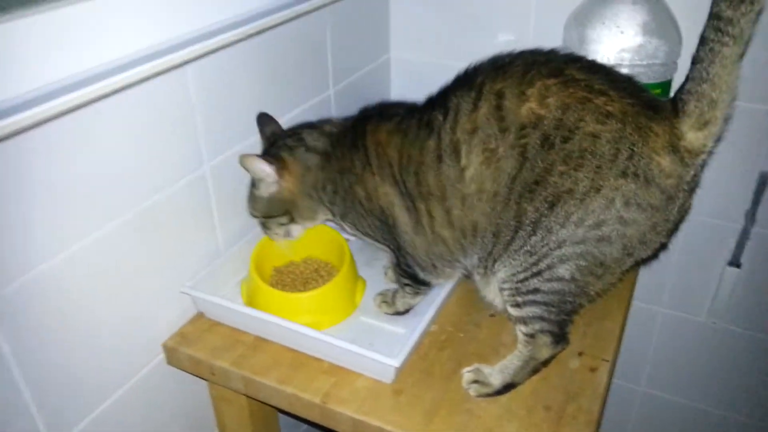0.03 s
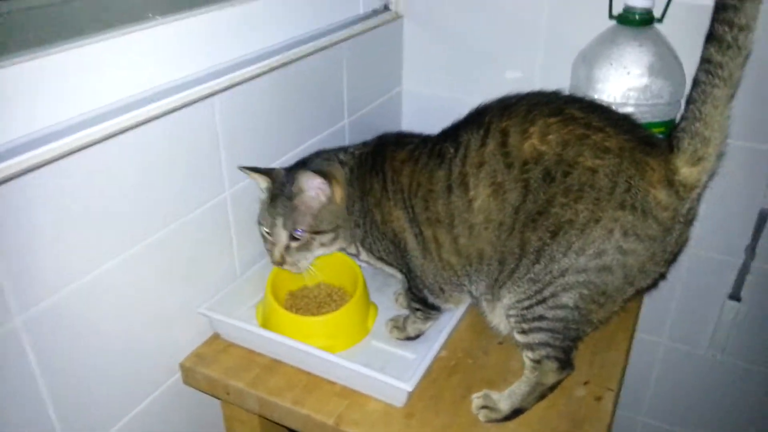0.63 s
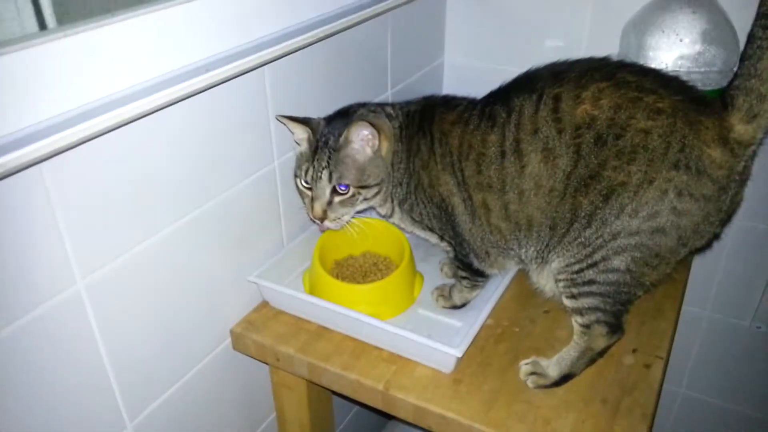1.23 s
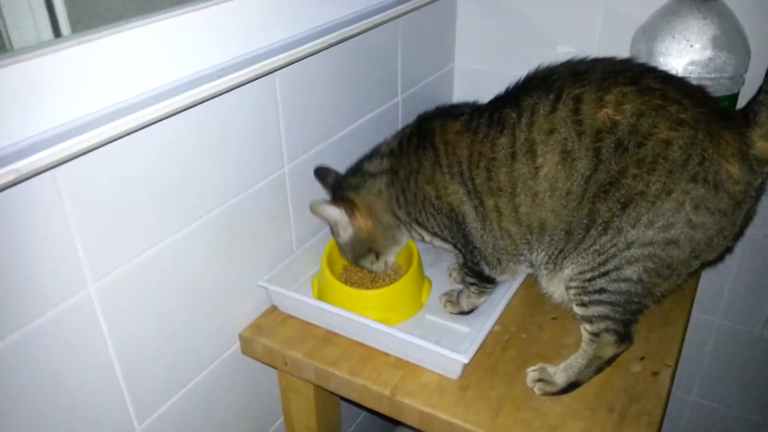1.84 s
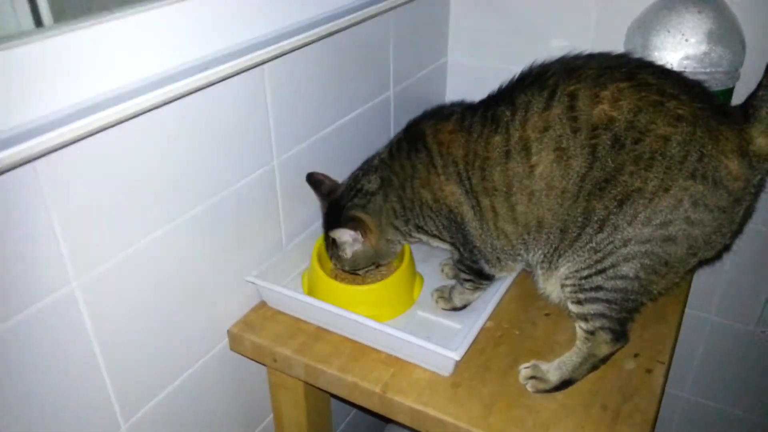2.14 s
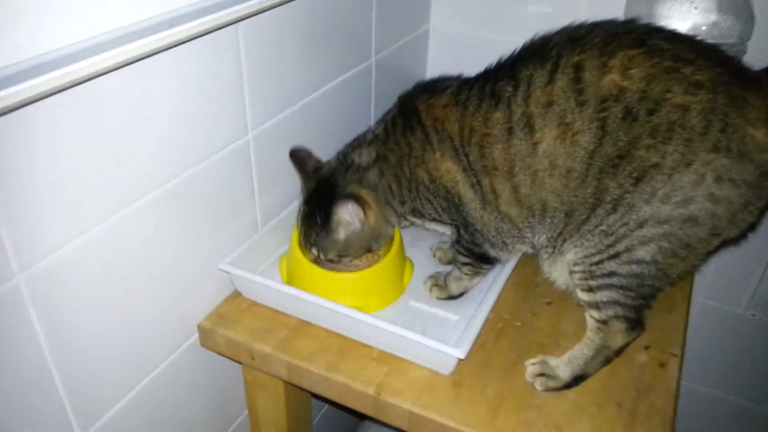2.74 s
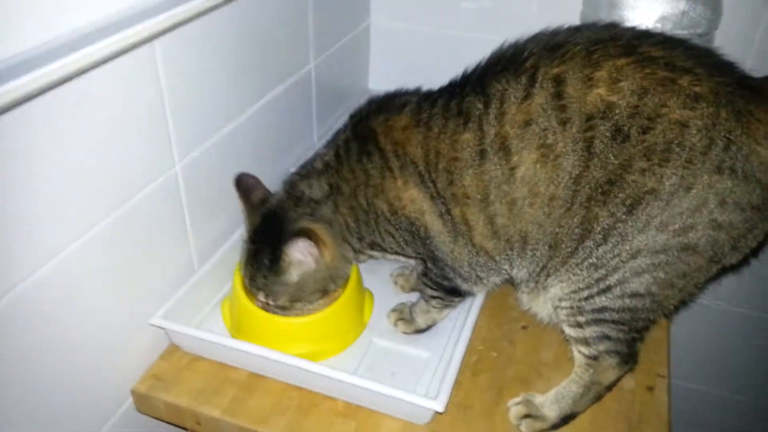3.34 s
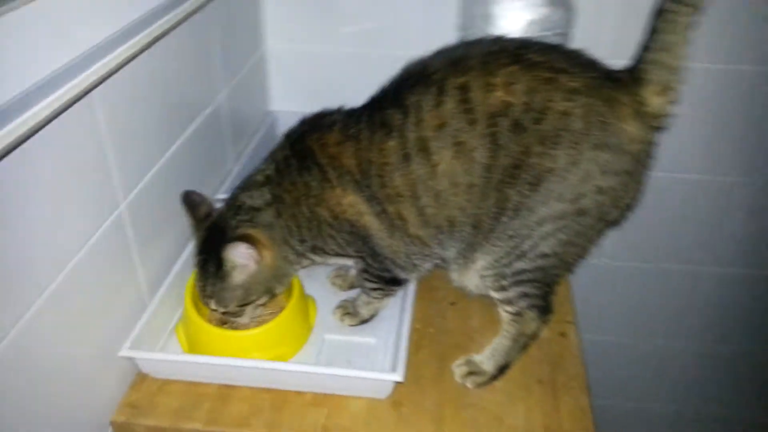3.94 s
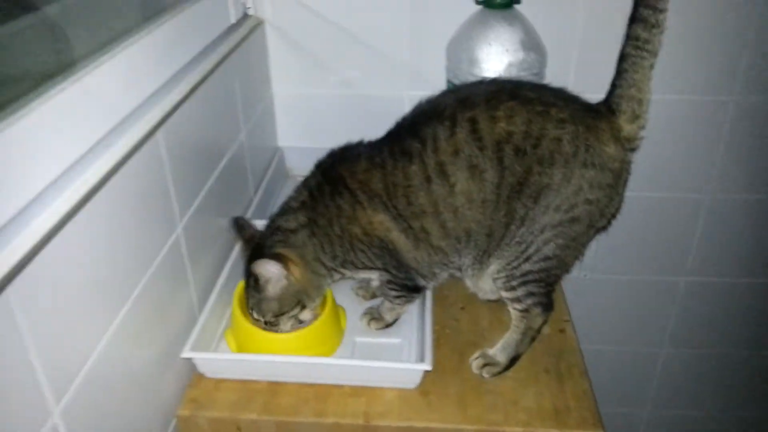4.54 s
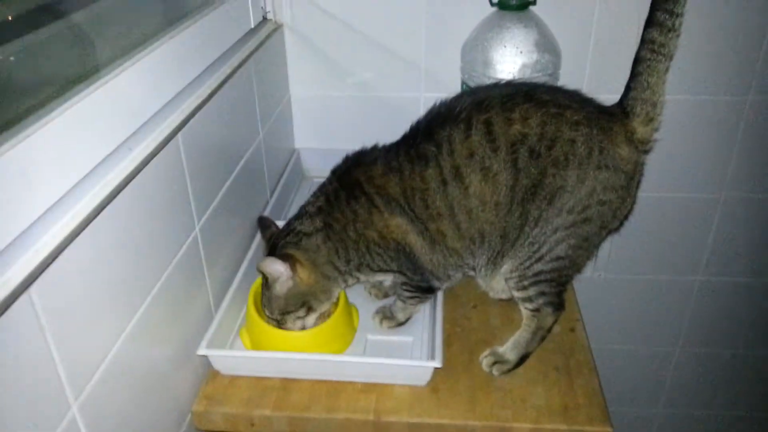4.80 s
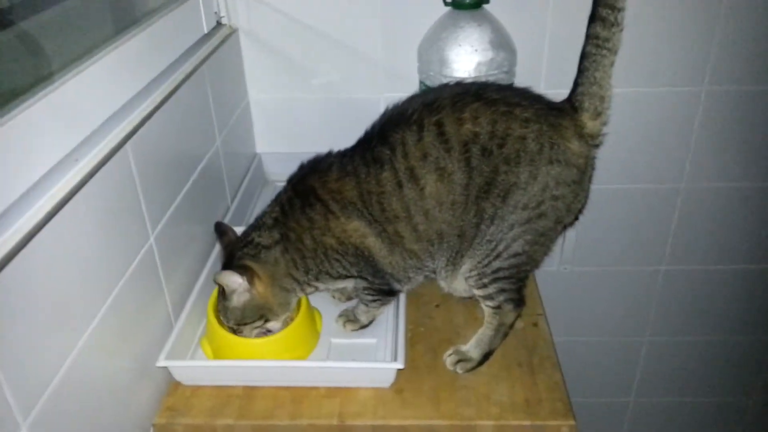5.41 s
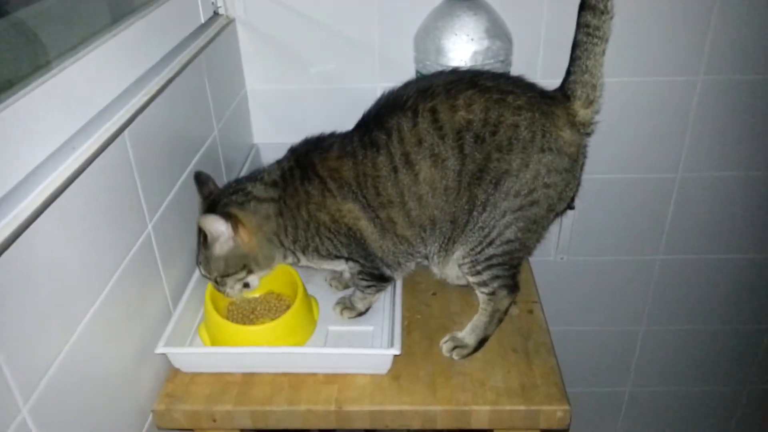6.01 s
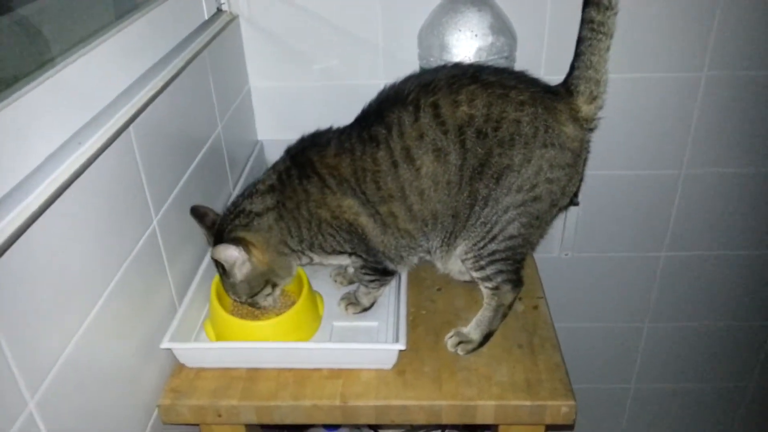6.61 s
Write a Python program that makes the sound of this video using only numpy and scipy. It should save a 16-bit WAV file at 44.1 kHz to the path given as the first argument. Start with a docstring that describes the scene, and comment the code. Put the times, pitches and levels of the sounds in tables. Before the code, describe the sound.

Close, crackling squeezes of a plastic bag give way to a cat quietly crunching dry food from a plastic bowl.

```python
"""Food bag and cat in a tiled room

Close by, a stiff food bag is squeezed: its film crackles, creases snap through and panels buckle.
Then a cat noses through kibble in a resonant plastic bowl and crunches it by brittle fracture,
in two spells, brushing the rim as it lifts its head between them.
Hard walls reflect every snap; a faint hiss of air lies underneath."""
import sys
import numpy as np
from scipy import signal
from scipy.fft import rfft, irfft, next_fast_len
from scipy.io import wavfile
from scipy.ndimage import uniform_filter1d

SR = 44100
rng = np.random.default_rng(int(sys.argv[2]) if len(sys.argv) > 2 else 0)


def master_out(mix):
    """Clip the mix to full scale and print it as 16-bit PCM to the path in sys.argv[1]."""
    frames = np.transpose(np.atleast_2d(mix))
    ceiling = np.clip(frames, -1, 1)
    pcm = np.round(ceiling * 32767).astype(np.int16)
    wavfile.write(sys.argv[1], SR, pcm)


N = 293701

# squeezes of the bag: (start [s], length [s], level [dB], body [dB], crispness [dB])
SQUEEZES = [(0.075, .04, -43, 6, -4), (0.115, 0.059, -22.5, 0, 4), (0.165, 0.035, -29, 12, -1),
            (0.27, 0.09, -36.5, 7.5, 0), (0.37, .035, -35, 6.5, 10), (0.41, 0.086, -29, 1.5, 1),
            (0.738, 0.033, -45, 13.5, 1), (0.822, 0.036, -18.5, 3.5, 2), (0.93, 0.093, -41, 8.5, 8.5),
            (1.03, 0.069, -41, 11, 2), (1.43, 0.055, -41.5, -11, 5), (1.485, 0.13, -38.5, 6, 5.5),
            (1.583, 0.045, -24.5, -1, 6), (1.76, 0.065, -30.5, 0.5, -1.5), (1.822, 0.016, -29.5, 8.5, 3),
            (1.87, 0.13, -38, 6.5, 0.5), (1.964, 0.037, -28, 7.5, 4), (2.035, 0.019, -33, 4, 0),
            (2.128, .03, -33, 10, 3), (2.18, 0.044, -27, 2, 1.5), (2.235, 0.066, -32.5, 4, 1),
            (2.335, .025, -40.5, 12.5, -1)]
# rustle while the bag is held: (start [s], length [s], level [dB], body [dB], crispness [dB])
HOLDING = [(0.0, 2.47, -47.5, 1.5, 4)]
# spectrum of the film: (frequency [Hz], level [dB])
FILM_SPECTRUM = [(30, -33), (100, -61), (175, -20), (351, -10), (450, -6), (600, -5), (931, 0), (1200, -1),
                 (1790, 3), (4000, 1.5), (4900, -3.5), (5900, -8.5), (13800, -17), (15500, -47)]
def crumpling():
    """Stiff film releases strain in many tiny jumps, a crackle without bass."""
    squeezing = effort(SQUEEZES, attack_s=0.0067, release_s=0.025)
    holding = effort(HOLDING, attack_s=0.025, release_s=0.16)
    hand = np.hypot(squeezing, holding)
    film = crackle(hand, FILM_SPECTRUM, per_s=2000, spread_db=5, clump_db=3, friction=0.36)
    return butter(from_db(1.5) * film, 247, "high")


# single creases: (time [s], level [dB], ring [Hz], body [dB], crispness [dB])
CREASES = [(0.0584, -41, 4200.0, 5, -9), (0.1182, -9, 4380, -27, -5), (0.1766, -12.5, 3400, 3.5, 2),
           (0.3707, -14.5, 3970, 3.5, 4), (0.4081, -10.5, 4620, 2.5, 5), (0.446, -11, 4200.0, -29, 5.5),
           (0.7378, -22.5, 3280, 4.5, -23), (0.7772, -28, 3800, 11, 4), (0.8141, -16, 3300.0, -7, -28),
           (0.8556, -22, 4330, 8, -6), (0.876, -11.5, 3260, 3, 1), (0.9478, -17.5, 4150, -10, -11),
           (0.9818, -26, 3700.0, -10, 0), (1.4866, -18.5, 3600, -1.5, -5), (1.5166, -20, 3200.0, -1, -9),
           (1.5799, -14, 3700.0, -5, -6), (1.595, -15, 3500.0, 8.5, -8), (1.6223, -11.5, 3530, -9, -14),
           (1.6365, -16.5, 4100, 2, 5.5), (1.8278, -9.5, 3600, -3.5, -6), (1.9411, -15.5, 3680, -27, -11),
           (1.967, -7, 4900, -33, -5.5), (1.994, -20.5, 3300.0, 12, -11), (2.006, -23.5, 4100.0, 14, 11),
           (2.0748, -11, 4340, -15, -3.5), (2.1322, -20, 4300.0, 1, 2), (2.1465, -26, 3600.0, 12, -16),
           (2.1656, -11, 2970, -5, 1.5), (2.1985, -20.5, 3500, 9, 6), (2.2793, -15, 4440, 1, -9),
           (2.3342, -19.5, 4100, -0.5, -10)]
# spectrum of a snapping crease: (frequency [Hz], level [dB])
CREASE_SPECTRUM = [(30, -34.5), (100, -35), (175, -36.5), (400, -8), (600, -4), (1100, -3), (2000, 4.5),
                   (3000, 1.5), (4200, 1), (5000, -0.5), (6000, -8), (13800, -16.5), (15500, -32.5)]
def creases():
    """Snap-through: a loaded crease jumps to a new shape with a sharp click."""
    clicks = snaps(CREASES, CREASE_SPECTRUM, tear_s=0.001, tear=0.61, width_hz=980, ringing=0.59)
    return from_db(-0.07) * clicks


# dull knocks of whole panels: (time [s], level [dB], pitch [Hz])
BUCKLES = [(0.203, -27.5, 523), (0.411, -25, 460), (2.009, -26.5, 423), (2.282, -25.5, 430)]
def buckles(width_hz=180, soft_hz=700):
    """Damped oscillation: a soft push sets a buckling panel swinging for a few cycles."""
    out = np.zeros(N)
    for s, db, hz in BUCKLES:
        push = butter(signal.unit_impulse(N, int(s * SR)), soft_hz, "low")
        swing = resonate(resonate(push, hz, width_hz), hz, width_hz)
        out += from_db(db) * unit(swing)
    return out * np.sqrt(IMPULSE_S * SR)


# stereo balance of the bag: (frequency [Hz], left minus right [dB])
BAG_BALANCE = [(200, -1), (700, -1.5), (1290, 1), (2380, 4), (4400, 2.5), (8120, -2.5), (15000, 0.5)]
def bag(tails):
    """Superposition: film, creases and panels radiate together into the room."""
    source = crumpling() + creases() + buckles()
    heard = in_room(source, tails, left_lag_s=.00023, direct_db=-4, scatter_db=-4.5, wet_db=-3, sway_db=3)
    return shaded(heard, BAG_BALANCE)


# strokes of the jaw: (start [s], length [s], level [dB], body [dB], crispness [dB])
CHEWS = [(2.645, 0.046, -32, 3.5, 1), (2.803, 0.039, -38.5, 5, 3), (2.878, .045, -42.5, -1, 5.5),
         (2.995, 0.087, -42, 9, 7), (3.242, 0.071, -44.5, 8, 3), (3.318, 0.048, -41, -3, -4),
         (3.466, .035, -43, -2.5, -8), (3.572, 0.03, -45.5, 1, -3), (3.778, 0.062, -46.5, 10, -18),
         (4.545, 0.064, -47.5, -10, 0), (4.685, 0.043, -40.5, 1.5, -11), (4.758, 0.064, -39.5, 3, -11),
         (4.97, .028, -38.5, -13, -2), (5.125, 0.021, -37, -17, -8), (5.243, 0.021, -40, 4.5, -7),
         (5.416, 0.032, -36, -2, -16), (5.568, 0.071, -40.5, -4, -19), (5.672, 0.047, -35, 0.5, -9),
         (5.946, 0.02, -46, 3, -10), (6.268, 0.025, -52.5, 9.5, 7.5), (6.422, 0.023, -53.5, 5.5, 8.5)]
# the muzzle stirs the pellets: (start [s], length [s], level [dB], body [dB], crispness [dB])
NOSING = [(2.42, 1.473, -49, -0.5, 4.5), (4.49, 1.26, -50.5, 3, 1.5)]
# spectrum of grinding kibble: (frequency [Hz], level [dB])
KIBBLE_SPECTRUM = [(100, -58), (225, -33.5), (450, -6.5), (600, -7.5), (760, -1.5), (1150, -5.5),
                   (1500, -2), (1950, 0), (3400, 1), (4700, -1), (5500, -11.5), (7000, -14), (14000, -25),
                   (15500, -55)]
def grinding():
    """Dry friction and tiny fractures: pellets shift in the bowl and grind between the teeth."""
    chewing = effort(CHEWS, attack_s=0.016, release_s=0.016)
    nosing = effort(NOSING, attack_s=0.039, release_s=0.12)
    mouth = np.hypot(chewing, nosing)
    grit = crackle(mouth, KIBBLE_SPECTRUM, per_s=3200, spread_db=4, clump_db=1.5, friction=0.67)
    return from_db(1.37) * grit


# pellets that crack or click: (time [s], level [dB], ring [Hz], body [dB], crispness [dB])
BITES = [(2.5088, -40, 3200, 1, -1), (2.6009, -24, 2860, -2.5, -2), (2.8254, -34, 2740, 6, -5),
         (3.012, -27.5, 2400, -2.5, -14), (3.1147, -27, 3500, -7, -15), (3.4815, -43, 2800, -2, -8),
         (3.8346, -36, 2500, 4.5, -16), (4.111, -39, 2430, -7, -22), (4.6926, -29.5, 1700, -1.5, -22.5),
         (4.991, -36.5, 3100, 7, 10), (5.1386, -29.5, 2200, 0.5, 8), (5.152, -27, 3630, -20, 2),
         (5.2568, -26.5, 3500, -3, 7), (5.429, -36.5, 2000, 7, -12), (5.4468, -27.5, 3400, -7, 4),
         (5.5811, -30.5, 2380, 2, 3), (5.6405, -27, 2690, 1, 6), (5.8809, -35, 2000, 1.5, -20),
         (5.9553, -29.5, 2200, -2.5, -13.5), (6.2705, -27.5, 4940, -18, 7.5), (6.277, -37, 4700, -4, 6),
         (6.453, -48, 2900, -1, 6)]
# spectrum of a breaking pellet: (frequency [Hz], level [dB])
PELLET_SPECTRUM = [(100, -53), (450, -18.5), (760, -2), (1400, 0), (2400, -3), (3200, -1), (4600, -2.5),
                   (5600, -10.5), (7000, -16.5), (14000, -48), (15500, -47)]
def bites():
    """Brittle fracture: a pellet cracks with a heavily damped ring, too small to radiate bass."""
    cracks = snaps(BITES, PELLET_SPECTRUM, tear_s=0.0018, tear=1.38, width_hz=1800, ringing=0.6)
    return butter(from_db(1.1) * cracks, 636, "high", order=3)


# modes of the plastic bowl: (frequency [Hz], bandwidth [Hz], gain [dB])
BOWL_MODES = [(932, 230, -2.5), (1345, 510, -3.5), (2420, 350, -18), (3500, 240, -22)]
def bowl(x):
    """Cavity resonance: the bowl adds its hollow ring to the sound made in it."""
    return x + sum(from_db(db) * np.pi * width / SR * resonate(x, hz, width)
                   for hz, width, db in BOWL_MODES)


# spectrum of fur on the rim: (frequency [Hz], level [dB])
FUR_SPECTRUM = [(530, -47), (900, -16), (943, -11), (1410, -9.5), (2180, -2), (4060, -7), (13800, -27),
                (15000, -32)]
def brush(start_s=4.135, length_s=0.21, level_db=-44.5):
    """Sliding friction: hairs on plastic hiss in proportion to the speed of the lifting head."""
    speed = np.sin(np.pi * np.clip((np.arange(N) / SR - start_s) / length_s, 0, 1))
    hiss = signal.fftconvolve(rng.standard_normal(N), click_of(FUR_SPECTRUM))[:N]
    return from_db(level_db) * speed * hiss


# stereo balance of the cat: (frequency [Hz], left minus right [dB])
CAT_BALANCE = [(380, 1.5), (700, -2.7), (1290, -0.3), (4400, 0.2), (8120, -4.5), (15000, 1.5)]
# slow shift of that balance: (time [s], left minus right [dB])
CAT_PAN = [(2.5, 1), (3.8, 0.5), (4.6, -2), (6.5, -1)]
def cat(tails):
    """Source and resonator: eating excites bowl and room, and drifts slightly from left to right."""
    source = bowl(grinding() + bites()) + brush()
    heard = in_room(source, tails, left_lag_s=.00034, direct_db=-8, scatter_db=-3, wet_db=-3.5, sway_db=7)
    pan_db = np.interp(np.arange(N) / SR, *np.transpose(CAT_PAN))
    return shaded(heard, CAT_BALANCE) * pan_gains(pan_db)


def effort(strokes, attack_s, release_s):
    """Incoherent addition: overlapping strokes sum in power, giving gains for body, middle and top."""
    t, power = np.arange(N) / SR, np.zeros((3, N))
    for start, length, db, body_db, crisp_db in strokes:
        rise = np.clip((t - start) / attack_s, 0, 1)
        fall = np.exp(-np.clip((t - start - length) / release_s, 0, 20))
        gains = from_db(db + np.array([body_db, 0, crisp_db]))
        power += np.outer(gains ** 2, (rise * fall) ** 2)
    return np.sqrt(power)


def crackle(gains, spectrum, per_s, spread_db, clump_db, friction):
    """Shot noise: tiny fractures of uneven size come in clumps over the rub of dry surfaces."""
    sizes = from_db(spread_db * np.minimum(rng.exponential(1, N), 4)) * rng.choice([-1, 1], N)
    fractures = unit(sizes * (rng.random(N) < per_s / SR))
    grains = fractures + friction * unit(rng.standard_normal(N))
    grains *= from_db(clump_db * drift(220))
    grains /= np.sqrt(uniform_filter1d(grains ** 2, size=900) + 1e-18)   # the effort sets the power
    coloured = signal.fftconvolve(grains, click_of(spectrum))[:N]
    return np.sum(gains * registers(coloured), axis=0)


IMPULSE_S = 0.004   # the level of a snap or knock is its energy spread over this time
def snaps(table, spectrum, tear_s, tear, width_hz, ringing, size=1024):
    """Impulse excitation: a sharp break and a brief tearing ring each piece at its own pitch."""
    out, click, t = np.zeros(N + size), click_of(spectrum), np.arange(size) / SR
    body_gain, middle_gain, top_gain = map(np.linalg.norm, registers(click))
    for s, db, hz, body_db, crisp_db in table:
        force = tear * unit(rng.standard_normal(size) ** 3 * np.exp(-t / tear_s))
        force[0] += 1   # the break itself
        body, middle, top = map(unit, registers(np.convolve(force, click)[:size]))
        middle = unit(middle + ringing * unit(resonate(middle, hz, width_hz)))
        snap = body_gain * from_db(body_db) * body + middle_gain * middle
        snap += top_gain * from_db(crisp_db) * top
        at = int(s * SR)
        out[at:at + size] += from_db(db) * np.sqrt(IMPULSE_S * SR) * snap
    return out[:N]


# reflections off the nearest surfaces: (delay [s], gain [dB])
ECHOES = [(.0027, -11), (.0061, -5), (.0112, -11)]
SCATTER_S = 0.0012   # time constant of the rattle among the closest surfaces
def in_room(x, tails, left_lag_s, direct_db, scatter_db, wet_db, sway_db, size=1200):
    """Multipath propagation: every fracture radiates its own way, so each moment takes new paths."""
    t = np.arange(tails.shape[-1]) / SR
    out = np.zeros((2, N + 2 * size + len(t)))
    fade = signal.windows.hann(2 * size, sym=False)
    padded = np.pad(x, (0, 2 * size))
    for k, at in enumerate(range(0, N, size)):
        moment = padded[at:at + 2 * size] * fade
        if np.abs(moment).max() < 1e-9:
            continue
        response = from_db(wet_db) * tails[k % len(tails)]
        scatter = unit(diffuse(size) * t[:size] * np.exp(-t[:size] / SCATTER_S))
        response[:, :size] += from_db(scatter_db) * scatter
        lag = round(left_lag_s * SR * (1 + .15 * rng.uniform(-1.1, 1)))
        lean_db = sway_db * rng.uniform(-0.79, 1) * np.array([1, -1])
        response[[0, 1], [lag, 0]] += from_db(direct_db + lean_db)
        for delay, db in ECHOES:
            arrival = delay * (1 + .15 * rng.uniform(-1, 1)) + STEREO_GAP_S * rng.random(2)
            response[[0, 1], (arrival * SR).astype(int)] += from_db(direct_db + db)
        heard = signal.fftconvolve(moment[None], response, axes=1)
        out[:, at:at + heard.shape[1]] += heard
    return out[:, :N]


# reverberation time: (frequency [Hz], time to fall 60 dB [s])
DECAY_TIMES = [(250, 0.39), (660, 0.63), (1740, 0.35), (4590, 0.33), (12000, 0.26)]
# standing waves between the tiled walls: (frequency [Hz], level [dB])
ROOM_MODES = [(381, -20), (499, 0), (561, -6), (723, -13), (966, 3), (1127, 1), (1308, 1), (1572, -2.5),
              (1978, -4), (2211, 2), (2462, -15)]
def reverberation(build_s, standing_db, standing_t60, count=14, size=28000):
    """Exponential decay: diffuse tails die sooner in the treble, and standing waves ring in them."""
    t, tail, waves = np.arange(size) / SR, 0, 0
    noise = rfft(np.array([diffuse(size) for _ in range(count)]))
    octave = np.log2(np.clip(np.fft.rfftfreq(size, 1 / SR), 125, 16000) / 125)
    for k in range(8):
        t60 = at_hz(DECAY_TIMES, 125 * 2 ** k)
        band = irfft(noise * np.maximum(1 - abs(octave - k), 0), size)
        tail += band * from_db(-60 * t / t60) / np.sqrt(t60)
    for hz, db in ROOM_MODES:
        phase_cycles = rng.random((2, 1)) * hz * STEREO_GAP_S
        waves += from_db(db) * np.sin(2 * np.pi * (hz * t + phase_cycles))
    waves *= from_db(-60 * t / standing_t60)
    onset = 1 - np.exp(-(t / build_s) ** 2)
    return unit(tail * onset) + from_db(standing_db) * unit(waves * onset)


# spectrum of the quiet room: (frequency [Hz], level [dB])
AIR_SPECTRUM = [(18, -47), (30, -33.5), (202, -9), (263, -5), (292, -3.5), (341, -4), (455, -1), (518, -1),
                (561, -1.5), (808, -2), (5890, -16), (14000, -13), (15500, -38)]
def air(level_db=-60):
    """Stationary noise: a faint, steady hiss of air from all sides."""
    hiss = signal.fftconvolve(diffuse(next_fast_len(N)), click_of(AIR_SPECTRUM)[None], axes=1)[:, :N]
    return from_db(level_db) * hiss


STEREO_GAP_S = 0.0004   # travel time of sound between left and right
def diffuse(size):
    """Diffuse field: white noise from all sides is coherent left and right only in the bass."""
    coherence = .97 * np.sinc(2 * np.fft.rfftfreq(size, 1 / SR) * STEREO_GAP_S)
    mid, side = rfft(rng.standard_normal((2, size)))
    return irfft(np.sqrt(1 + coherence) * mid + np.sqrt(1 - coherence) * side * [[1], [-1]], size)


def shaded(x, balance):
    """Acoustic shadow: the far side is weaker by an amount that depends on frequency."""
    size = next_fast_len(N + 2048)
    tilt_db = at_hz(balance, np.fft.rfftfreq(size, 1 / SR))
    return irfft(rfft(x, size) * pan_gains(tilt_db), size)[:, :N]


def pan_gains(difference_db):
    """A level difference, split evenly between left and right."""
    return from_db(difference_db / 2 * np.array([[1], [-1]]))


def registers(x, body_hz=1500, crisp_hz=6400):
    """Crossover: split a sound into body, middle and crisp top."""
    def twice(v, hz, kind):
        return butter(butter(v, hz, kind), hz, kind)
    upper = twice(x, body_hz, "high")
    return twice(x, body_hz, "low"), twice(upper, crisp_hz, "low"), twice(upper, crisp_hz, "high")


def click_of(spectrum, size=2048):
    """Minimum phase: the shortest causal click with this spectrum."""
    magnitude = from_db(at_hz(spectrum, np.fft.rfftfreq(size, 1 / SR)))
    cepstrum = irfft(np.log(magnitude))
    cepstrum[1:size // 2] *= 2
    cepstrum[size // 2 + 1:] = 0
    return unit(irfft(np.exp(rfft(cepstrum))))


def resonate(x, hz, width_hz):
    """One damped resonance."""
    r = np.exp(-np.pi * width_hz / SR)
    return signal.lfilter([1, 0, -1], [1, -2 * r * np.cos(2 * np.pi * hz / SR), r * r], x)


def butter(x, hz, kind, order=2):
    """Causal Butterworth filter."""
    return signal.sosfilt(signal.butter(order, hz, kind, fs=SR, output="sos"), x + 1e-18)


def drift(per_s):
    """Random modulation: Gaussian values joined by straight lines."""
    knots = rng.standard_normal(int(N / SR * per_s) + 2)
    return np.interp(np.arange(N) / SR * per_s, np.arange(len(knots)), knots)


def at_hz(points, hz):
    """Read a table on a log-frequency axis."""
    f, value = np.transpose(points)
    return np.interp(np.log(np.maximum(hz, 1)), np.log(f), value)


def from_db(db):
    """Decibels to gain."""
    return 10 ** (np.asarray(db) / 20)


def unit(x):
    """Scale to an energy of one."""
    return x / np.sqrt(np.sum(x ** 2, axis=-1, keepdims=True) + 1e-20)


def scene():
    """Superposition: bag and cat share one reverberant room, over the hiss of air."""
    tails = reverberation(build_s=0.0035, standing_db=-22.5, standing_t60=0.51)
    return bag(tails) + cat(tails) + air()


def record(dry):
    """Soft saturation rounds the loudest snaps; a steep low-pass cuts the top."""
    rounded = 1.1 * np.tanh(dry / 1.1)
    return signal.sosfilt(signal.ellip(10, .2, 75, 14750, fs=SR, output="sos"), rounded)


dry = scene()
out = record(dry)
master_out(out)
```